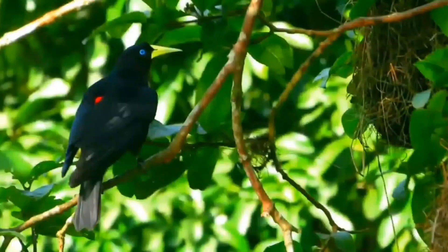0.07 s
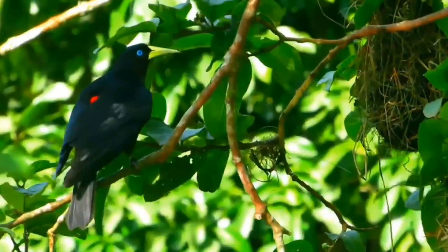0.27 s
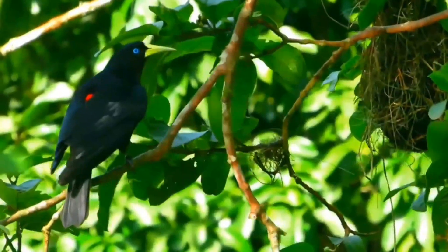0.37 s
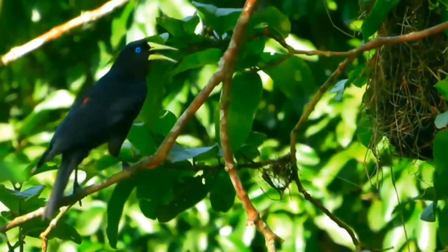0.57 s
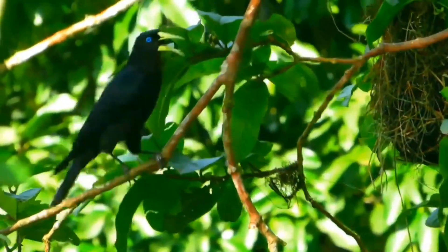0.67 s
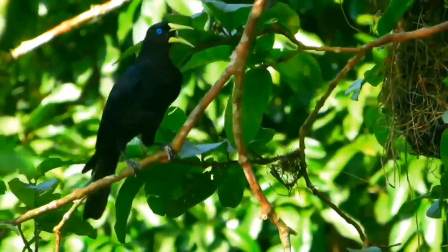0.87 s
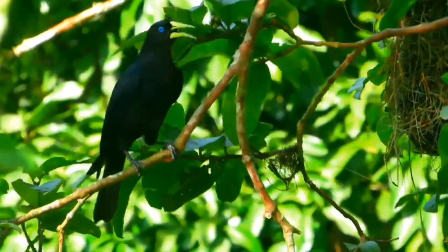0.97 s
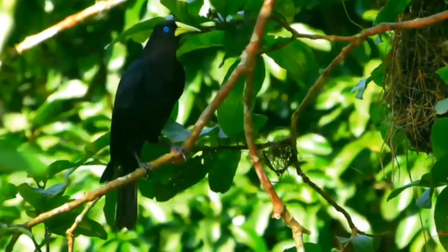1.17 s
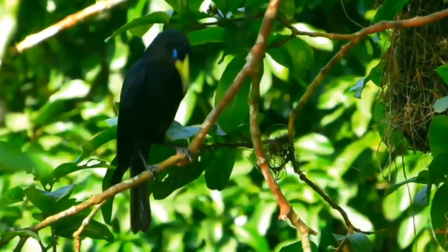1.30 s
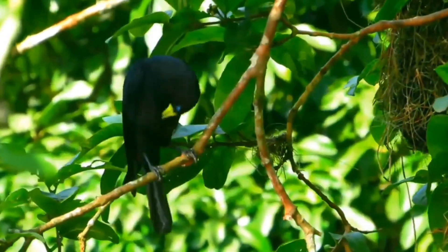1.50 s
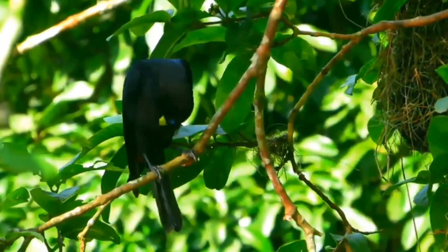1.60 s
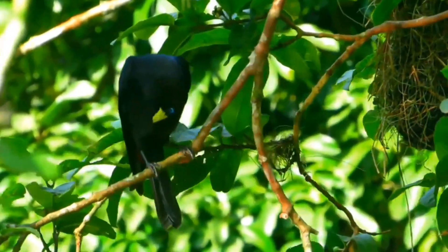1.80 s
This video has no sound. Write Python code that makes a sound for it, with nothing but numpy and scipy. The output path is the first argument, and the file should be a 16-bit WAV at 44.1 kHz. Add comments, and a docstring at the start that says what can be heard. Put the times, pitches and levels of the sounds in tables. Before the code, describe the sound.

A bird gives three harsh squawks over faint chirps and trilling insects.

```python
"""Insects trill over a faint outdoor rumble, and a small bird whistles further off.
A perched bird then gives three harsh squawks among leaves, the first in two parts. Both sides
of its syrinx sound at once, a rough wandering low voice and a pulsing upper one, with rasp
and hiss from the open beak. Small birds chip in between. After the first second only their
whistles, the insects and the rumble carry on."""
import sys
import numpy as np
from scipy import signal
from scipy.fft import rfft, irfft, next_fast_len
from scipy.io import wavfile
from scipy.ndimage import uniform_filter1d, map_coordinates

SR = 44100
rng = np.random.default_rng(int(sys.argv[2]) if len(sys.argv) > 2 else 0)


def put_to_file(sound):
    """Save the sound as 16-bit audio at rate SR, in the file named by the first command-line argument."""
    columns = np.atleast_2d(sound).T  # one column per channel
    safe = np.clip(columns, -1, 1)
    whole_steps = np.round(safe * 32767)
    wavfile.write(sys.argv[1], SR, whole_steps.astype(np.int16))


N = 81585

# pitch contour of the squawk's low voice: t/s, f/Hz
LOW_VOICE_PITCH = [(.165, 1650), (.177, 2418), (.19, 1677), (.218, 1750), (.25, 2050), (.275, 1895),
                   (.296, 1901), (.312, 2199), (.34, 2265), (.41, 2101), (.512, 1800), (.53, 1450),
                   (.56, 1600), (.61, 1921), (.655, 2047), (.677, 1720), (.686, 2192), (.70, 1830),
                   (.74, 2095), (.80, 2050), (.818, 1717), (.85, 1951), (.872, 2200), (.9, 2050),
                   (.93, 1607)]
# stereo image of rasp and hiss: f/Hz, left-right correlation
BEAK_CORRELATION = [(2000, 0.9), (3500, 0.86), (6000, 0.84), (9000, 0.69), (13000, 0.23)]


def amp(db):
    return 10 ** (np.asarray(db) / 20)


def unit(x):
    return x / np.sqrt(np.mean(x ** 2) + 1e-20)


def clock():
    return np.arange(N) / SR


def along(points, hz):
    """A curve of (f/Hz, value) points, read on a log frequency axis."""
    f, v = np.transpose(points)
    return np.interp(np.log(hz + 1), np.log(f + 1), v)


def wobble(rate):
    """A smooth random curve, rate knots a second."""
    return map_coordinates(rng.standard_normal(N // 4), [clock() * rate + 3], mode="wrap")


def gate(start, end, attack, release):
    """Opens at start and closes at end, with soft edges."""
    return (1 + np.tanh((clock() - start) / attack)) * (1 - np.tanh((clock() - end) / release)) / 4


def envelope(s, db):
    """Gain along a level curve, closed at both ends."""
    return amp(np.interp(clock(), s, db)) * gate(s[0], s[-1], 0.0026, 0.003)


def tone(hz):
    """A sine of rms 1 on a pitch or pitch curve."""
    return np.sqrt(2) * np.sin(2 * np.pi * (np.cumsum(hz * np.ones(N)) / SR + rng.random()))


def pan(x, db):
    """Left up and right down by db."""
    return x * amp(np.vstack([db, -db]))


def filtered(x, response):
    """EQ by a gain function of frequency."""
    m = next_fast_len(N + SR // 2)
    return irfft(rfft(x, m) * response(np.fft.rfftfreq(m, 1 / SR)), m)[..., :N]


def noise(spectrum, correlation, patchy_db, shape=lambda hz, s: 1):
    """Coloured stereo noise of rms 1 with random patches; shape is a moving EQ."""
    def mid_side_eq(f):
        width = np.arccos(np.clip(along(correlation, f), -1, 1)) / 2
        return amp(along(spectrum, f)) * [np.cos(width), np.sin(width)]

    hz, s, bins = signal.stft(rng.standard_normal((2, N)), SR, nperseg=512, noverlap=384)
    patches = unit(uniform_filter1d(uniform_filter1d(rng.standard_normal(bins.shape[1:]), 4, 0), 14, 1))
    bins = bins * amp(patchy_db * patches) * shape(hz[:, None], s)
    pair = signal.istft(bins, nperseg=512, noverlap=384)[1][:, :N]
    mid, side = filtered(pair, mid_side_eq)
    return unit(np.array([mid + side, mid - side]))


def air():
    """A wide outdoor bed of rumble and wavering distant hum, leaning left."""
    # colour of the rush: f/Hz, relative level/dB
    spectrum = [(20, -12), (35, -3), (85, -3.5), (160, 0), (280, -1), (430, -3.5), (600, -1), (1100, -9),
                (1600, -8.5), (3500, -11.5), (5000, -10), (7300, -12), (8600, -19), (12300, -19.5),
                (14000, -31)]
    # its stereo image: f/Hz, left-right correlation
    correlation = [(30, 0.0076), (70, -0.066), (150, 0.57), (400, 0.097), (1500, 0.55), (8000, -0.3)]
    # hum tones: f/Hz, level/dB
    hums = [(90, -56), (195, -53)]
    # balance: f/Hz, left over right/dB
    balance = [(100, 4.5), (400, 4), (800, 2), (2500, 2), (9000, 1.5)]
    hum = sum(amp(db + 3.1 * wobble(9.46)) * tone(hz + 5 * wobble(18)) for hz, db in hums)
    rush = amp(-36 + 0.26 * wobble(6.36)) * noise(spectrum, correlation, patchy_db=1.5)
    return filtered(rush + hum, lambda hz: pan(1, along(balance, hz) / 2))


def insects():
    """One trill pulsing at the wing rate, and a few thin steady tones."""
    # trill partials: offset from the carrier/wing rates, relative level/dB
    sidebands = [(-2, -9), (-1, -7), (0, -0.5), (1, -19)]
    # thin tones: start/s, end/s, f/Hz, level/dB
    thin_tones = [(1.33, 1.79, 7270, -52), (1.65, 1.74, 7275, -54.5), (1.09, 1.186, 6180, -51.5),
                  (1.08, 1.9, 3500, -54), (0, 1.6, 7270, -59)]
    carrier_hz, wing_hz, trill_db = 4575, 74.1, -44.5
    drift = np.cumsum(2 * wobble(11.4)) / SR
    trill, thin = np.zeros((2, N))
    for k, db in sidebands:
        cycles = (carrier_hz + k * wing_hz) * clock() + drift
        trill += np.sqrt(2) * amp(trill_db + db) * np.cos(2 * np.pi * cycles)
    for start, end, hz, db in thin_tones:
        gain = amp(db + wobble(24.5)) * gate(start, end, 0.023, 0.025)
        thin += gain * tone(hz + 6 * wobble(60.2))
    return pan(trill * amp(1.4 * wobble(59.5)), -0.2) + pan(thin, 0.97)


def whistles():
    """Small birds further off whistle thin, slightly unsteady glides."""
    # one contour per note: t/s, f/Hz, level/dB
    notes = [
        [(.04, 3090, -28), (.053, 3290, -33.5), (.061, 3300, -64)],
        [(.04, 2507, -42), (.065, 2512, -37), (.09, 2510, -44), (.125, 2380, -48)],
        [(.127, 3530, -46), (.14, 3330, -38.5), (.155, 2800, -36), (.17, 3120, -30), (.178, 3300, -50)],
        [(.452, 3400, -46), (.456, 3100, -29), (.46, 2600, -46)],
        [(.916, 5410, -40), (.932, 4770, -33), (.944, 4470, -46)],
        [(.985, 2597, -46), (1.012, 2730, -44), (1.024, 3150, -39), (1.035, 3955, -52), (1.04, 3680, -37),
         (1.046, 3180, -33), (1.057, 2730, -42), (1.07, 2490, -44)],
        [(1.178, 2300, -49), (1.197, 2335, -39.5), (1.235, 2355, -33), (1.285, 2433, -40.5), (1.305, 2440, -45),
         (1.33, 2524, -37), (1.37, 2587, -35), (1.425, 2612, -44), (1.44, 2570, -64)],
        [(1.545, 8100, -60), (1.552, 8120, -35), (1.562, 8080, -54), (1.61, 8100, -57)],
        [(1.805, 2250, -63), (1.825, 2300, -45.5), (1.85, 2370, -31.5)],
    ]
    out = np.zeros(N)
    for note in notes:
        s, hz, db = np.transpose(note)
        out += envelope(s, db) * tone(np.interp(clock(), s, hz) + 7 * wobble(200))
    return out


def membrane(hz, jitter_hz, jitter_rate, shimmer_db):
    """A membrane vibrating chaotically around its pitch."""
    return unit(tone(hz + jitter_hz * wobble(jitter_rate)) * amp(shimmer_db * wobble(420)))


def low_pitch(s):
    return np.interp(s, *np.transpose(LOW_VOICE_PITCH))


def low_voice(gain):
    """One side of the syrinx: a rough wandering tone with brief clean squeaks on top."""
    # clean glides: start/s, end/s, first f/Hz, last f/Hz, level/dB
    squeaks = [(.176, 0.19, 2600, 1587, -27), (0.293, 0.318, 2100, 2866, -24),
               (.313, 0.33, 2150, 2240, -22.5), (.663, .671, 2050, 1560, -24.5),
               (0.677, .683, 1750, 1950, -25), (.684, 0.698, 2347, 1815, -23.5),
               (0.844, 0.856, 1850, 1874, -22.5)]
    t = clock()
    voice = gain * membrane(low_pitch(t), jitter_hz=152.8, jitter_rate=900, shimmer_db=2.5)
    for start, end, first_hz, last_hz, db in squeaks:
        glide = np.interp(t, [start, end], [first_hz, last_hz])
        voice += amp(db) * gate(start, end, 0.0018, 0.0028) * tone(glide)
    return voice


def rasp():
    """Fluttering midrange grit whose steep low cut follows the low voice, over a faint body."""
    # colour ahead of the low cut: f/Hz, relative level/dB
    spectrum = [(600, -14.5), (1300, -14), (1900, 2.5), (2650, 2), (3150, 2), (3650, -6), (4100, -22),
                (5000, -50)]

    def low_cut(hz, s):
        corner_hz, order, leak_db = 0.93 * low_pitch(s), 5.9, -17
        return amp(leak_db) + 1 / np.sqrt(1 + (corner_hz / (hz + 1)) ** (2 * order))

    grit = noise(spectrum, BEAK_CORRELATION, patchy_db=2.8, shape=low_cut)
    return unit(grit * amp(1.3 * wobble(350)))


def hiss():
    """Bright hiss with narrow resonances that come and go as the beak moves."""
    # colour of the hiss: f/Hz, relative level/dB
    spectrum = [(1000, -28.5), (3000, -2.5), (4500, -3), (5800, 0), (7200, 0), (8300, -3.5), (10000, -2.5),
                (11300, -7), (12500, -5.5), (14300, -15)]
    # beak resonances: start/s, end/s, f/Hz, boost/dB
    resonances = [(.28, 0.417, 10300, 10), (0.573, 0.62, 6810, 10.5), (0.545, 0.641, 8660, 7.5),
                  (0.59, 0.632, 9400, 5), (0.633, 0.756, 5740, 5), (0.685, 0.767, 7740, 7),
                  (0.812, 0.898, 7700, 4)]

    def peaks(hz, s, width_hz=150):
        return amp(sum(db * ((s > start) & (s < end)) * np.exp(-((hz - centre) / width_hz) ** 2)
                       for start, end, centre, db in resonances))

    breath = noise(spectrum, BEAK_CORRELATION, patchy_db=2.5, shape=peaks)
    return unit(breath * amp(0.51 * wobble(900)))


def upper_voice():
    """The other side of the syrinx: short, higher bursts with a fast tremolo."""
    # bursts: start/s, end/s, f/Hz, level/dB
    bursts = [(0.207, 0.227, 3253, -27), (0.241, 0.256, 3255, -24.5), (0.319, 0.334, 3040, -26),
              (.328, 0.375, 2707, -23.5), (0.39, 0.424, 2678, -31), (0.522, 0.546, 2327, -26),
              (0.574, 0.596, 2616, -25), (0.624, .672, 3495, -20.5), (0.71, 0.729, 3345, -20.5),
              (0.821, 0.838, 3460, -24.5), (0.867, 0.896, 3390, -18.5), (0.899, .93, 3470, -33),
              (.952, 0.996, 3450, -40.5)]
    pulse_hz, depth = 112, 0.66
    voice = np.zeros(N)
    for start, end, hz, db in bursts:
        pulse = 1 + depth * np.sin(2 * np.pi * pulse_hz * (clock() - start))
        rough = membrane(hz, jitter_hz=81.0, jitter_rate=700, shimmer_db=0.5)
        voice += amp(db) * gate(start, end, attack=0.0043, release=0.0055) * unit(pulse * rough)
    return voice


def squawks():
    """Three calls: both sides of the syrinx at once, with rasp and hiss from the open beak."""
    # one set of envelopes per call, ahead of the mix trims: t/s, low voice/dB, rasp/dB, hiss/dB
    calls = [
        [(0.16, -29, -38, -47), (0.18, -31.5, -31.5, -31.5), (0.218, -27, -24.5, -28.5), (0.242, -35, -26, -27),
         (0.264, -32, -27, -32.5), (0.28, -32, -27.5, -39), (0.29, -23.5, -31.5, -35.5),
         (0.324, -24, -26, -32.5), (0.332, -31, -31, -33.5), (0.36, -27.5, -30, -32.5),
         (0.406, -35, -29, -40.5), (0.422, -50, -44, -40)],
        [(0.508, -39, -37, -43), (0.523, -31.5, -31, -46), (0.535, -31.5, -29, -27), (0.562, -27, -29, -26.5),
         (0.58, -29.5, -21, -24), (0.61, -20.5, -23, -23), (0.63, -28, -21.5, -22.5), (0.642, -52, -24, -25.5),
         (0.668, -25.5, -24, -25.5), (0.71, -23.5, -25.5, -24), (0.76, -44, -38.5, -33.5),
         (0.772, -45, -43, -37)],
        [(0.785, -49, -38, -37), (0.8, -30, -29.5, -34), (0.82, -23.5, -26, -23.5), (0.88, -23, -28, -22),
         (0.898, -35, -27, -25.5), (0.915, -30, -28.5, -29), (0.96, -45.5, -54, -42)],
    ]
    attack_s = 0.0029
    gains = np.zeros((3, N))
    for call in calls:
        s, *levels = np.transpose(call)
        onset = 1 - np.exp(-np.maximum(clock() - s[0], 0) / attack_s)
        gains += onset * np.array([envelope(s, db) for db in levels])
    low_gain, rasp_gain, hiss_gain = gains
    return (pan(low_voice(amp(-2) * low_gain) + upper_voice(), 1.1)
            + pan(amp(1.5) * rasp_gain * rasp(), 0.86)
            + pan(amp(1) * hiss_gain * hiss(), 0.51))


def chips():
    """A small bird's chips, each a quick arch up and a longer drop in pitch."""
    # top of each chip: t/s, reference f/Hz, level/dB
    tops = [(.348, 5000, -34), (.416, 4950, -30.5), (0.4844, 5250, -30.5), (.759, 5170, -37.5)]
    # shape of a chip: t from the top/s, pitch ratio, relative level/dB
    arch = [(-.009, .78, -5), (-.003, .94, -2), (0, 1.02, -0.5), (.004, .87, -2), (.008, .755, -9),
            (0.018, .72, 3.5), (.022, .65, 2.5), (.027, 0.48, -5)]
    offset, ratio, arch_db = np.transpose(arch)
    out = np.zeros(N)
    for top, hz, db in tops:
        s = top + offset
        out += envelope(s, db + arch_db) * tone(hz * np.interp(clock(), s, ratio))
    return out


def branches(x):
    """Eight weak early reflections from nearby boughs comb the sound."""
    latest_s, reflection_db = 0.012, -18
    out = x.copy()
    for delay, side in rng.random((8, 2)):
        lag = int((0.2 + 0.8 * delay) * latest_s * SR)
        reflection = np.pad(x, ((0, 0), (lag, 0)))[:, :N]
        out += amp(reflection_db) * pan(reflection, 6 * (side - 0.5))
    return out


def foliage(x):
    """Leaves and trunks scatter a short reverb tail."""
    # decay times: f/Hz, t60/s
    t60 = [(500, 0.19), (3300, 0.6), (7000, 0.63), (13000, 0.27)]
    hz, t, bins = signal.stft(rng.standard_normal((2, SR // 2)), SR, nperseg=256)
    tail = signal.istft(bins * amp(-60 * t / along(t60, hz)[:, None]), SR, nperseg=256)[1]
    impulse = np.pad(tail, ((0, 0), (300, 0))) / np.linalg.norm(tail[0])  # 7 ms pre-delay
    return signal.fftconvolve(x, impulse, axes=1)[:, :N]


def scene():
    """The squawker up front, the small birds wetter behind it, over insects and air."""
    near = branches(squawks())
    far = pan(chips() + whistles(), 0.96)
    reverb = foliage(amp(-11) * near + amp(-5) * far)
    return near + far + reverb + insects() + air()


def record(dry):
    """The sound opens after a moment, through two narrow notches and a high cut."""
    # dips in the microphone response: f/Hz, width/Hz, depth (0-1)
    notches = [(3945, 45, 0.75), (7820, 44, 0.6)]
    start_s, top_hz = 0.046, 14500

    def response(f):
        dips = [1 - depth * np.exp(-((f - hz) / width) ** 2) for hz, width, depth in notches]
        return np.prod(dips, axis=0) * (f < top_hz)

    fade_in = np.clip((clock() - start_s) * 1000, 0, 1)
    return filtered(dry * fade_in, response)


dry = scene()
out = record(dry)
put_to_file(out)
```